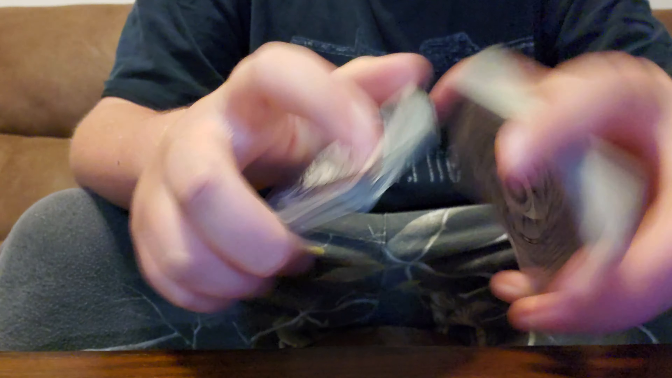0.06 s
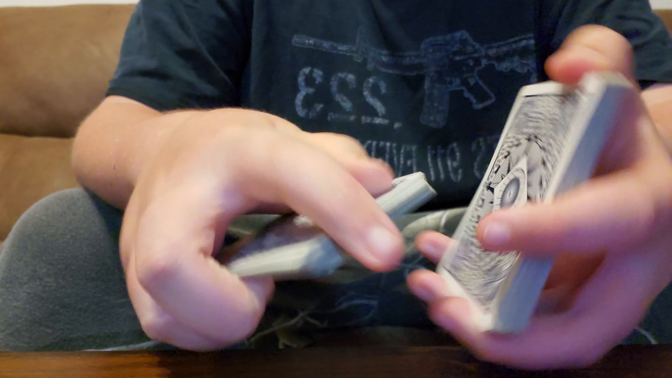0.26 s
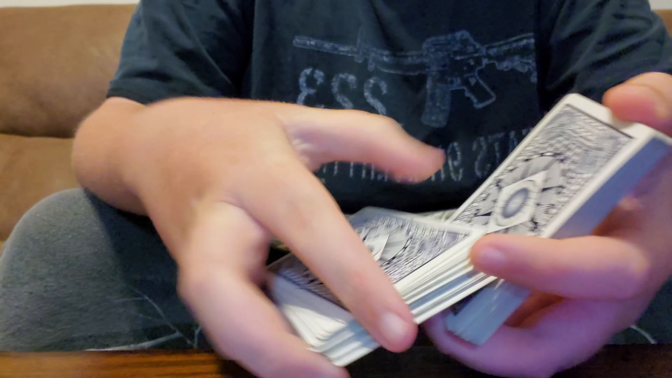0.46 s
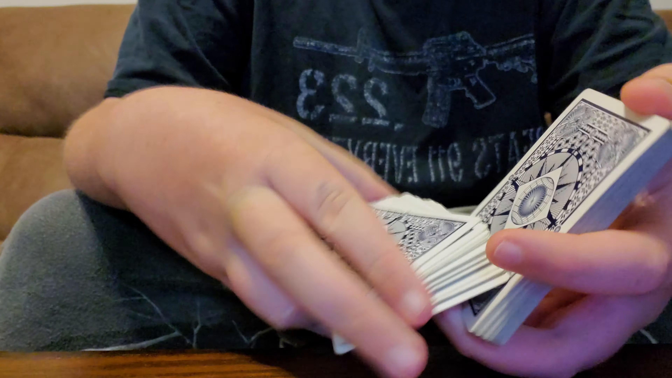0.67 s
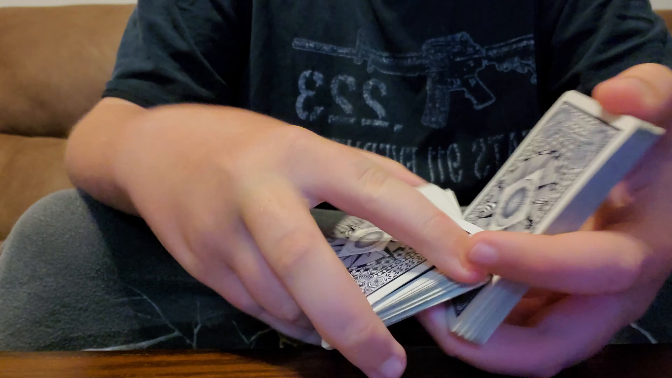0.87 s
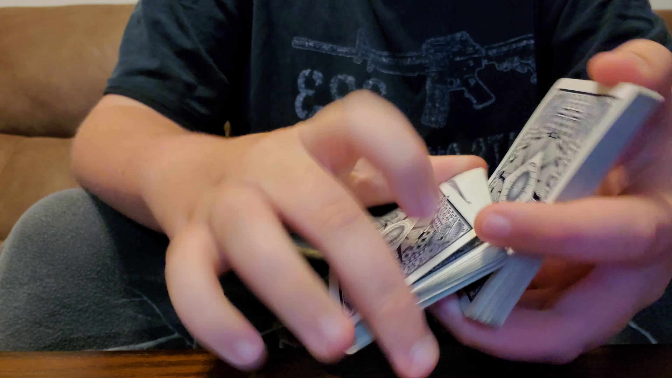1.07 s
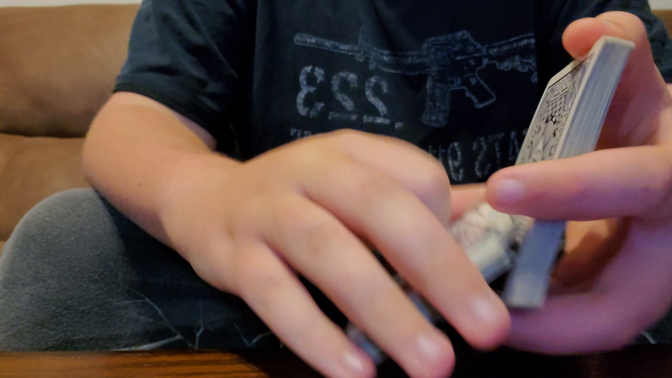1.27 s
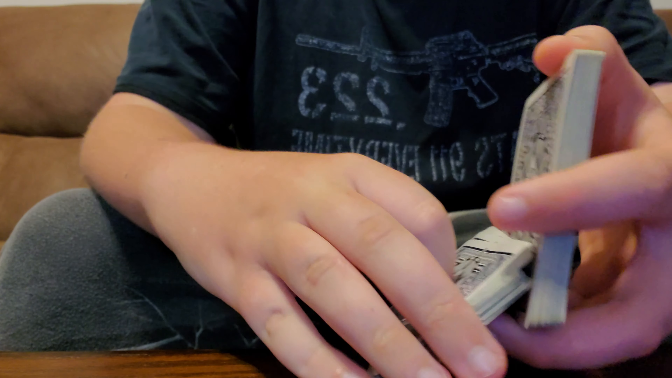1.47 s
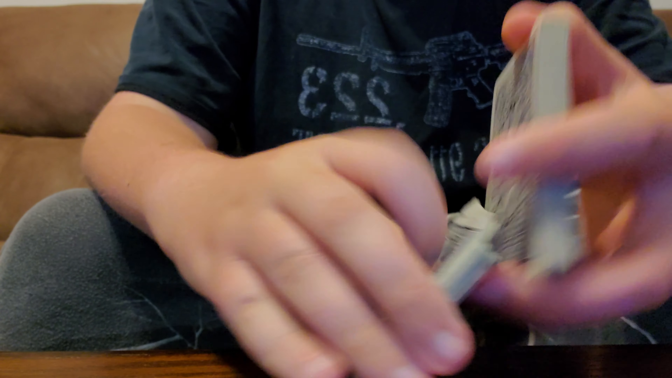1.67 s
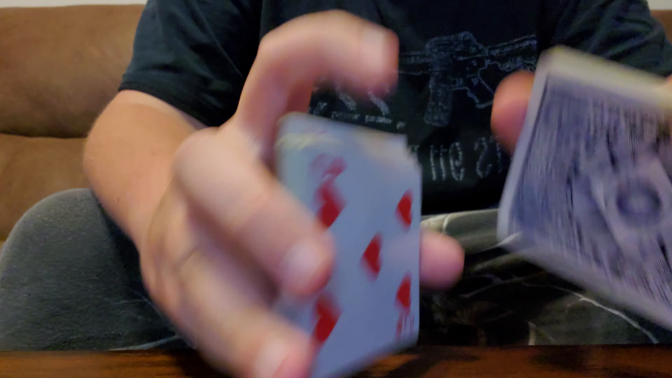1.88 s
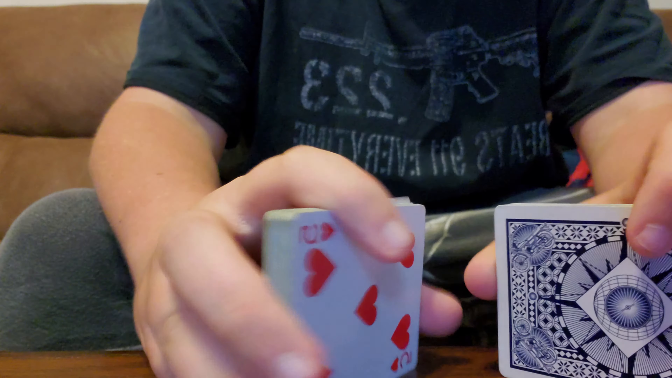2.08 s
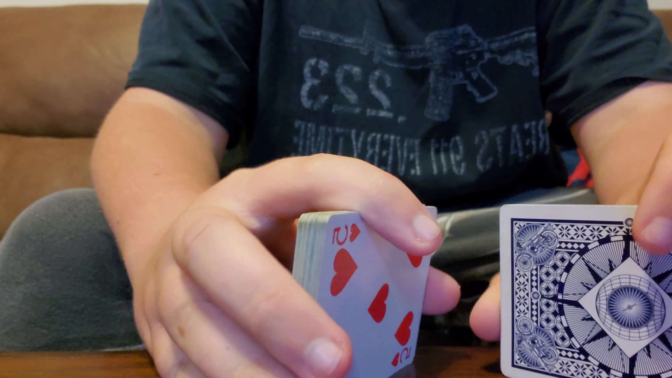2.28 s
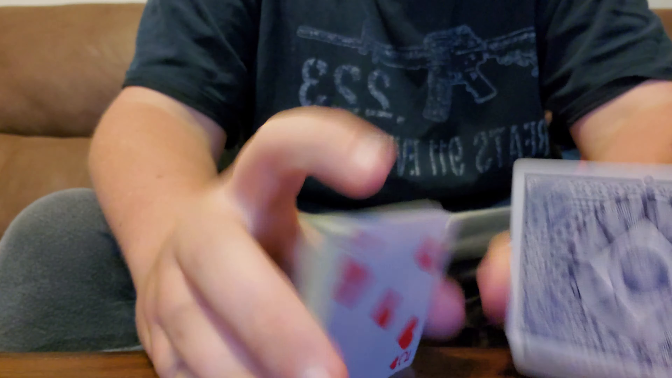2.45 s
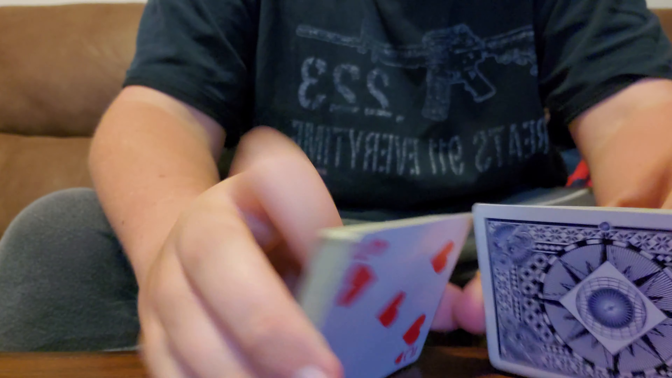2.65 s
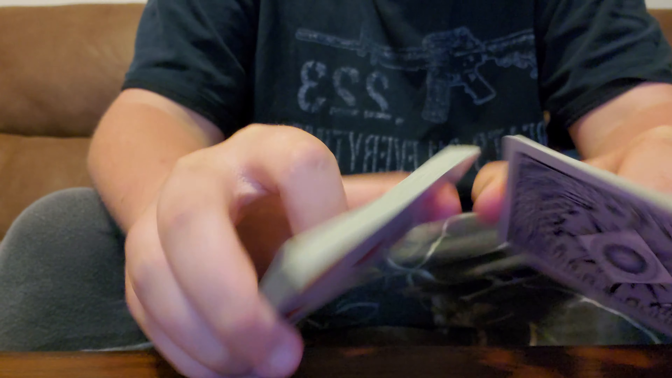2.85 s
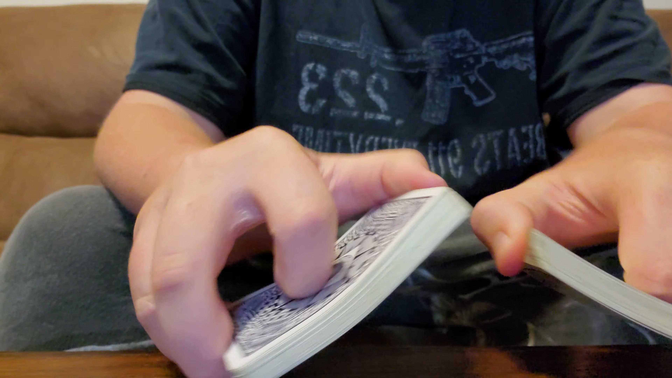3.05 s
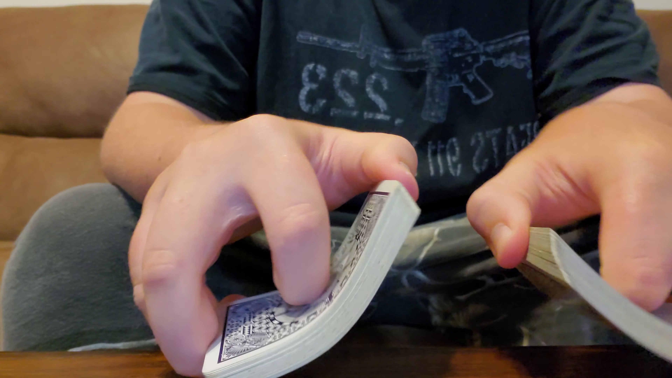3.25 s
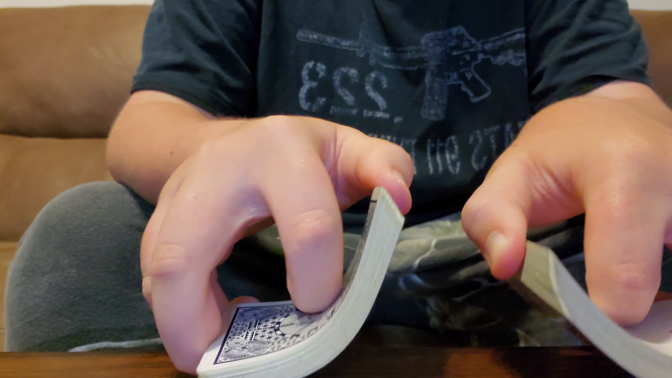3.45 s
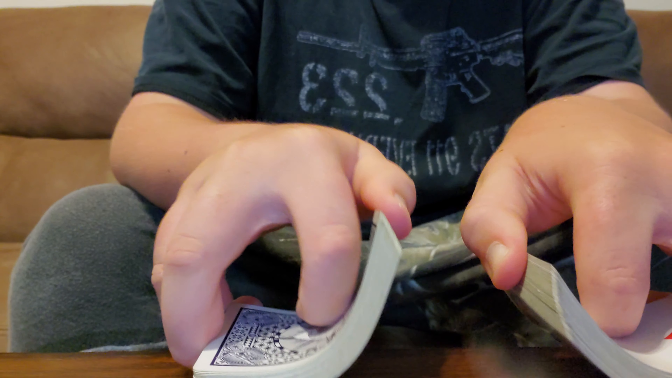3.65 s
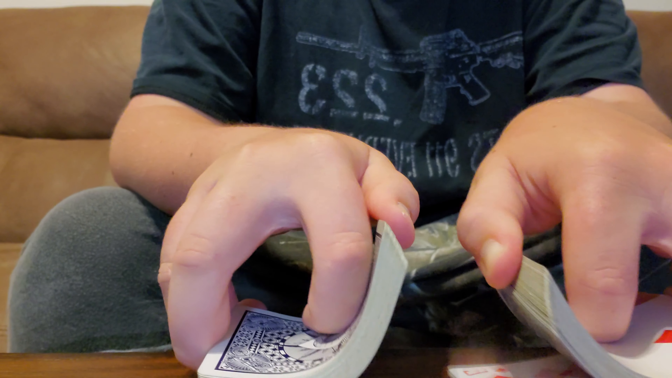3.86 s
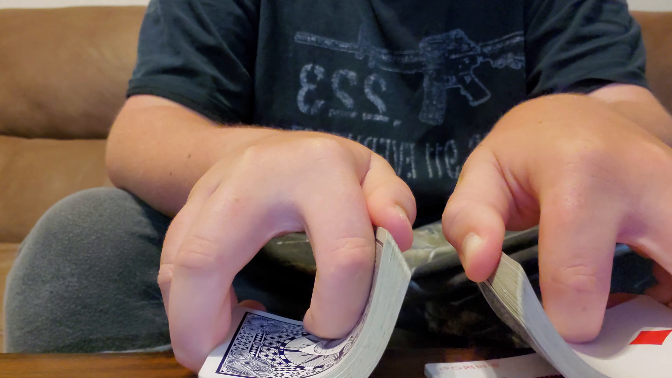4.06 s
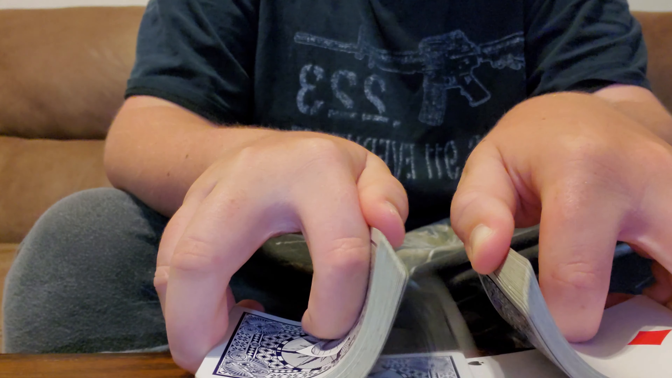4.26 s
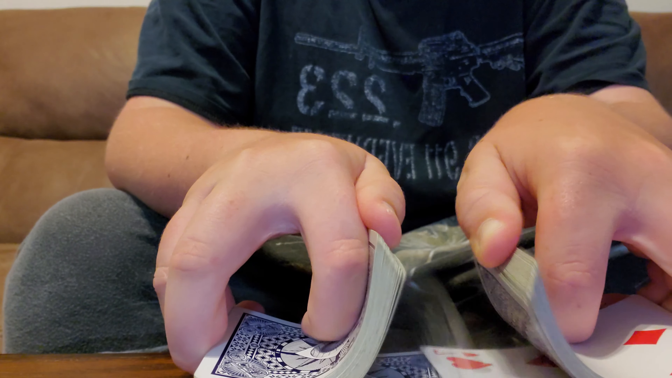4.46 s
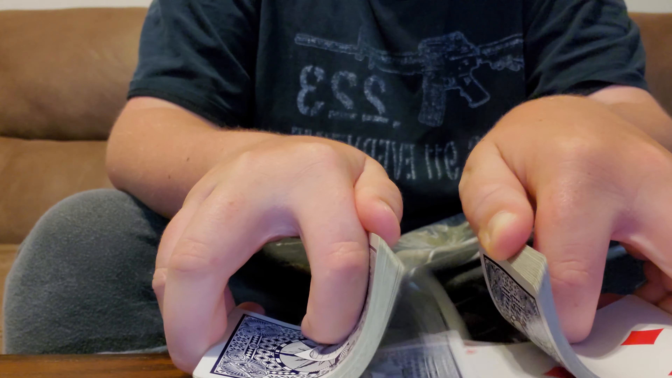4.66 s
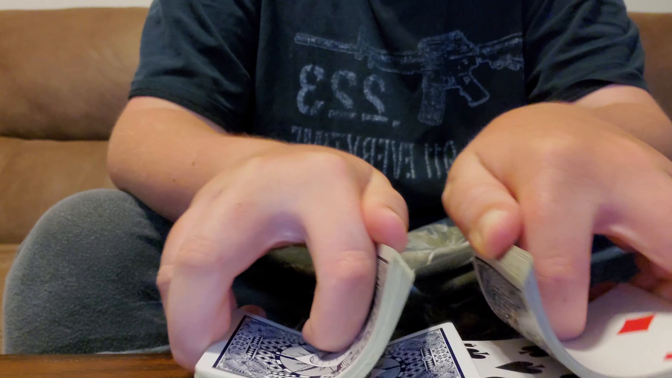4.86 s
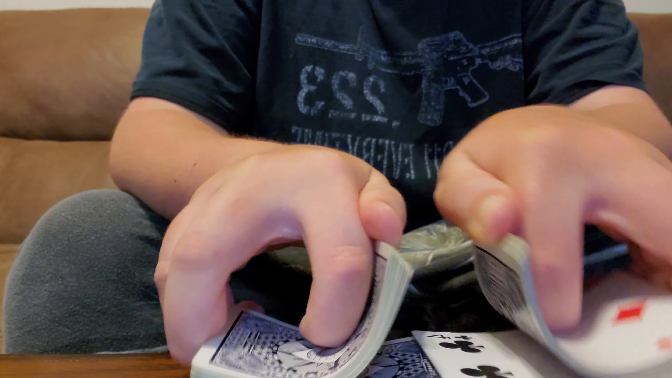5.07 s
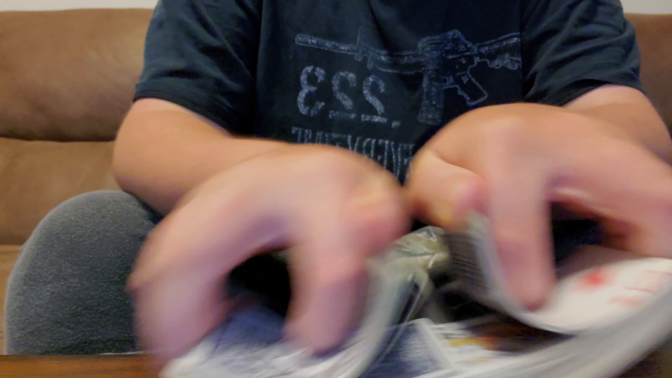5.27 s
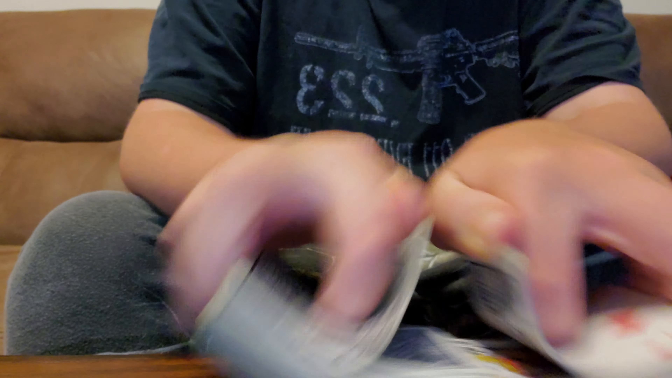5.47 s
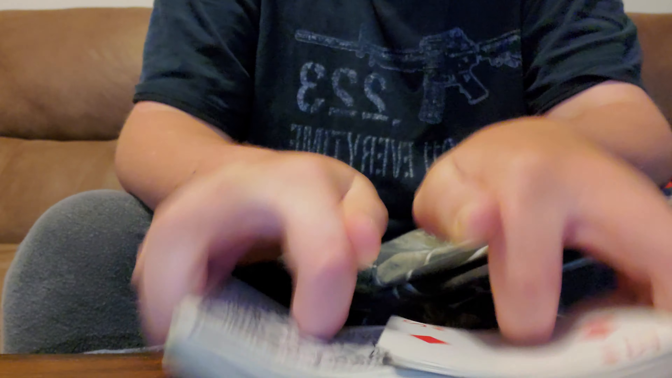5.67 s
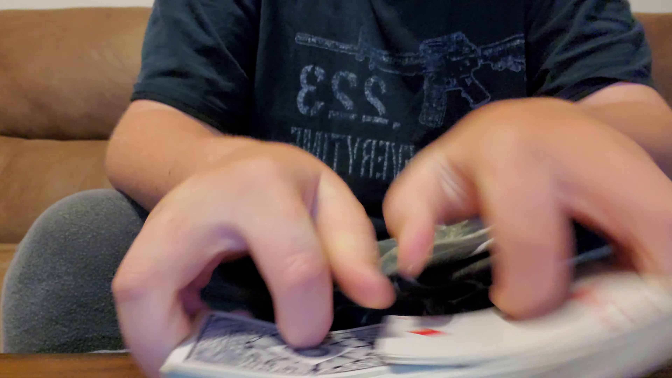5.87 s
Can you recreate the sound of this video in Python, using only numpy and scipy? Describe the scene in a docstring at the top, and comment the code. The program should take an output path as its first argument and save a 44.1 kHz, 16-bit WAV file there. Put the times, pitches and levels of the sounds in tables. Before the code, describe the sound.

Faint papery scuffs of a handled deck come first, over a quiet low room rumble. Around two seconds a rapid woody clatter squares the halves, with a shorter double knock half a second later. A near-quiet gap follows, then a slow riffle: bright dry ticks and slaps, irregularly spaced, thickening toward the end, with puffs of air and a short room tail, heard close in stereo.

```python
"""A small living room, a wooden table, a two-port microphone close to a deck of playing cards.
The deck is handled, its halves are knocked square on the wood, then it is riffled slowly.
Each card slips off the thumb with a tick, flexes, pushes out an air cushion and slaps the pile: filtered noise
bursts and short resonances. The table thumps under it as decaying modes and a dull noise thud.
The room answers through a decaying noise tail, over a soft ventilation rumble and a faint hum."""
import sys
import numpy as np
from scipy import signal
from scipy.fft import rfft, irfft, next_fast_len
from scipy.io import wavfile

SR = 44100
rng = np.random.default_rng(int(sys.argv[2]) if len(sys.argv) > 2 else 0)


def put_to_file(sound):
    """Save the sound as 16-bit audio at rate SR, in the file named by the first command-line argument."""
    columns = np.atleast_2d(sound).T  # one column per channel
    safe = np.clip(columns, -1, 1)
    whole_steps = np.round(safe * 32767)
    wavfile.write(sys.argv[1], SR, whole_steps.astype(np.int16))


N = 261513

# ventilation level over time: start_s [s], level_db [dB]
AIR_LEVEL = [(0, -45.5), (1.8, -46), (2.8, -48.5), (3.2, -49.5), (3.7, -49.5), (5.93, -50)]
# ventilation spectrum: freq_hz [Hz], gain_db [dB]
AIR_COLOUR = [(15, -71), (25, -30.5), (35, -23), (49, -3.5), (87, 2.5), (137, -8.5), (285, -4.5),
              (677, -16.5), (887, -20), (1100, -24.5), (2220, -44.5), (3250, -40.5), (4610, -64),
              (7310, -50.5), (16000, -61)]
# ventilation noise shared by the ports, and nearly separate at each: freq_hz [Hz], gain_db [dB]
AIR_SHARED = [(300, 4.0), (1200, -6.5), (4000, -21.0)]
AIR_SEPARATE = [(200, -10.5), (1200, 3), (4000, 9)]
# steady hum tones: pitch_hz [Hz], level_db [dB]
HUM_TONES = [(59.2, -59.5), (231.5, -66), (290.7, -75.5), (527.6, -76.5), (882.9, -67.5)]
# rumble of moved air at the ports: freq_hz [Hz], gain_db [dB]
PUFF_COLOUR = [(15, -29.0), (35, -22.5), (55, 0), (90, -4.5), (160, -19.5), (500, -44.5), (2000, -90.0)]
# draughts from swaying packets: peak_s [s], level_db [dB], fall_s [s]
DRAUGHTS = [(4.43, -32, 0.25), (4.76, -22.5, 0.12), (5.756, -23, 0.022)]
# cards sliding in the fingers: peak_s [s], body_db [dB], fall_s is second: peak_s, fall_s [s],
# body_db [dB], hiss_db [dB against the body]
SLIDES = [(.04, .04, -65.5, -2.5), (0.129, .022, -60.5, 2), (.495, .09, -70.5, -1.5), (.87, .05, -77, 3),
          (1.021, .022, -62.5, -3.5), (1.088, .022, -53.5, -5), (1.25, 0.037, -61.5, 3),
          (1.36, .06, -64, -7), (1.41, .014, -53.5, -13), (1.676, 0.013, -57.5, -16),
          (1.735, 0.027, -60.5, -10), (1.83, .1, -62.5, -12.5), (2.3, .05, -66, 0),
          (2.6, 0.055, -50.5, -25), (2.865, .02, -71, 0), (3.046, .07, -65.5, -9)]
# hands and held packets bumping the table: start_s [s], level_db [dB]
BUMPS = [(1.017, -29.5), (1.403, -34), (2.0041, -20.5), (2.4823, -17), (3.038, -34.5), (5.4339, -23.5),
         (5.452, -17), (5.605, -19.5), (5.75, -30)]
# card backs rubbing: freq_hz [Hz], gain_db [dB]
RUSTLE_COLOUR = [(500, -6.5), (1500, 0.5), (2200, 1), (2750, -0.5), (3100, 4), (3500, 1), (4600, -20),
                 (9000, -32.5)]
# decay of the room: freq_hz [Hz], t60_s [s]
ROOM_DECAY = [(100, 0.46), (500, 0.56), (1500, 0.7), (3500, 0.45), (8000, 0.41), (15000, 0.27)]
# colour of the reflections: freq_hz [Hz], gain_db [dB]
WALL_COLOUR = [(50, -18), (150, -5), (400, -1), (1100, -10), (3200, -7.5), (5500, -2), (9000, -2),
               (16000, 0.5)]
# riffle sent to the room, low early on while the hands cover the cards: start_s [s], gain_db [dB]
RIFFLE_ROOM_SEND = [(3.73, -10), (3.95, -15), (4.2, -8), (4.33, -7.5), (4.8, -7), (5.15, -11), (5.6, -8.5)]
# bending modes of the table top: pitch_hz [Hz], level_db [dB], t60_s [s]
TABLE_MODES = [(59.5, -14.5, .16), (89.4, -1, 0.35), (111, 5, 0.04), (178, 1.5, 0.031), (259, -3.5, 0.0089)]
# dull thud of the pile under a blow: freq_hz [Hz], gain_db [dB]
THUD_COLOUR = [(30, -36.5), (70, -12.5), (140, 3), (260, -3.5), (420, -4), (700, -20), (2000, -40),
               (8000, -69)]
# modes of a stiff packet against wood: pitch_hz [Hz], level_db [dB], t60_s [s]
PACKET_MODES = [(310, -18, 0.028), (400, -4, 0.12), (540, -0.5, 0.088), (683, -8.5, 0.012),
                (833, 1.5, 0.04), (1028, 3.5, 0.14), (1157, 0, 0.034), (1515, 14, 0.028),
                (1883, -15.5, 0.11), (1800, 3, 0.087)]
# hiss of single card edges: freq_hz [Hz], gain_db [dB]
EDGE_COLOUR = [(2000, -1), (4200, 0), (5800, -2.5), (8400, 7.5), (9800, -0.5), (12000, 6), (15500, -10)]
# edge of a whole packet brushing the wood: freq_hz [Hz], gain_db [dB]
BLUNT_EDGE_COLOUR = [(2000, 2.5), (4200, 16), (5800, -2.5), (8400, 11.5), (10200, -17.5), (12000, 1),
                     (14000, -20.5), (16000, -24.5)]
# air cushion of a landing card: freq_hz [Hz], gain_db [dB]
CUSHION_COLOUR = [(40, -19.5), (120, 1.5), (400, -1), (900, -1), (2200, 8.5), (3600, -8), (4800, -16),
                  (9000, -11), (16000, -2.5)]
# card faces clapping together: freq_hz [Hz], gain_db [dB]
CLATTER_COLOUR = [(150, -0.5), (500, 1), (1100, 3), (1900, -0.5), (2600, -1), (4200, -12.5), (6000, -43.5),
                  (12000, -42.5)]
# packet edges hitting the table: start_s [s], ring_db, slap_db, hiss_db [dB], contact_s [s]
KNOCKS = [(1.9873, -31, -31.5, -50, .0017), (1.9954, -17.5, -16.5, -28.5, 0.004),
          (2.0041, -17, -21.5, -34.5, 0.0044), (2.03, -36, -20.5, -42, 0.0037),
          (2.0366, -32.5, -21.5, -52, 0.0025), (2.0618, -10.5, -22.5, -26, 0.00064),
          (2.0708, -22, -28.5, -34, .0028), (2.0789, -21.5, -31.5, -39, 0.00055),
          (2.1621, -28.5, -40.5, -51.5, 0.0004), (2.4822, -54.5, -27.5, -57, 0.0022),
          (2.4915, -20.5, -14.5, -44.5, 0.00072), (2.5254, -48, -10, -33, .0012),
          (2.5327, -21.5, -16.5, -26, .003)]
# cards flicking off the thumbs: start_s [s], ring_db, hiss_db [dB], pitch_hz [Hz], contact_s [s]
FLICKS = [(3.734, -23.5, -21, 3120, 0.0031), (3.7681, -20, -27.5, 3190, 0.0014),
          (3.8103, -22, -28, 2980, 0.00035), (3.922, -24.5, -34, 3000, 0.00068),
          (4.0486, -20.5, -24.5, 3110, 0.00021), (4.066, -22.5, -35, 3230, 0.000067),
          (4.218, -20, -25.5, 2970, 0.00026), (4.2757, -18, -24, 2740, 0.00021),
          (4.2826, -14, -21, 3280, 0.00092), (4.3228, -27.5, -31.5, 2950, 0.0013),
          (4.3842, -18, -25, 2970, .0015), (4.4398, -32, -36, 2970, 0.0034),
          (4.4486, -16.5, -17, 3300, 0.00066), (4.494, -14.5, -20.5, 3400, 0.00098),
          (4.5277, -29, -24.5, 2780, 0.0011), (4.533, -13, -29.5, 3180, 0.0032),
          (4.647, -28, -37, 3040, 0.0021), (4.6846, -14, -17, 3220, .0043),
          (4.7084, -24.5, -26.5, 3300, 0.0093), (4.7309, -26, -31, 3120, 0.0021),
          (4.7456, -23, -35, 3130, 0.0012), (4.7675, -30, -30.5, 2950, 0.0011),
          (4.7713, -13.5, -22, 3220, 0.0015), (4.83, -28, -36.5, 3450, 0.0036),
          (4.8861, -19, -32, 3130, 0.0015), (4.8924, -16, -21.5, 3160, 0.0022),
          (4.9454, -15.5, -23.5, 3200, 0.003), (5.0244, -22.5, -31.5, 3060, 0.002),
          (5.032, -24.5, -27, 3400, 0.0033), (5.0744, -33, -27.5, 3330, 0.0025),
          (5.0815, -20, -21, 3600, 0.002), (5.1584, -24, -27, 3400, .0039),
          (5.1629, -25.5, -23, 3420, 0.001), (5.2392, -35.5, -19, 2700, 0.0003),
          (5.2596, -31.5, -38, 3140, 0.0012), (5.284, -21, -21.5, 3060, 0.00085),
          (5.297, -25.5, -38, 3450, 0.00056), (5.3085, -14.5, -20, 2610, 0.0013),
          (5.3124, -21, -19, 3340, 0.0046), (5.411, -31, -35, 2790, 0.003),
          (5.4349, -25, -26.5, 2800, 0.00088), (5.452, -23, -28, 2660, 0.00033),
          (5.4688, -24, -32, 3560, 0.00013), (5.546, -17, -24.5, 3070, 0.00046),
          (5.5766, -22, -25, 3900, 0.0034), (5.585, -28, -17.5, 3300, 0.0034),
          (5.6023, -21, -21, 3150, 0.0024), (5.6172, -24, -21.5, 3080, 0.00064)]
# treble difference between the microphone ports: freq_hz [Hz], left_minus_right_db [dB]
PORT_DIFFERENCE = [(120, -.5), (500, -2.3), (1000, -3), (2800, -2.5), (3200, -4.5), (4400, 0), (5800, -6),
                   (7200, -7), (8400, 3), (10200, 5), (11700, -2), (13800, -9), (16000, -9)]

TOP_HZ = 16000
# buffer of one short sound, with its contact LEAD samples in
SIZE, LEAD = 16384, 512
AGE = (np.arange(SIZE) - LEAD) / SR  # seconds since contact
TIME = np.arange(N) / SR
# every landing fans a puff of air
PUFF_DB, PUFF_RISE_S, PUFF_FALL_S = -44, 0.01, 0.022
# rise time as a share of the fall time: slides gather speed faster than they stop
SLIDE_RISE_SHARE, DRAUGHT_RISE_SHARE = 0.6, 0.93
# each card creeps over the thumb before it snaps free, then skids on the pile:
# body against its ring, hiss against its edge hiss
CREEP_S, SKID_S, SKID_BODY_DB, SKID_HISS_DB = 0.0051, 0.031, -21, -30
KNOCK_RING_HZ = 2950
KNOCK_THUMP_DB = -12.5  # against the slap
# cards weigh the same: a short contact slaps the air, a longer one pushes the table (levels for 1 ms)
FLICK_SLAP_DB, SLAP_DB_PER_DOUBLING = -22.5, -1.5
FLICK_THUMP_DB, THUMP_DB_PER_DOUBLING = -28, 1.7
# the riffle climbs the packets, so later cards drop from higher and thump harder
DROP_DB_PER_S = 2.5
# a card that springs hard has less left for its landing: dB lost per dB of ring above the knee
SPRING_KNEE_DB, SPRING_LOSS = -18, 1
# a hard snap beams at the microphone: room share lost, in dB per dB of ring above the knee
BEAM_KNEE_DB, BEAM_LOSS = -14, 0.8


def amp(db):
    """Decibels to amplitude."""
    return 10 ** (np.asarray(db) / 20)


def at_hz(points, hz):
    """Read a table of (Hz, value) on a log-frequency axis."""
    f, v = np.transpose(points)
    return np.interp(np.log(np.maximum(hz, 1)), np.log(f), v)


def colour(x, points):
    """Causal minimum-phase filter with the given (Hz, dB) response."""
    n = next_fast_len(x.shape[-1] // 2 + 1024) * 2
    gain_db = at_hz(points, np.fft.rfftfreq(n, 1 / SR))
    cepstrum = irfft(np.log(amp(gain_db)))
    # folding the cepstrum forward makes the filter causal
    cepstrum[1:n // 2] *= 2
    cepstrum[n // 2 + 1:] = 0
    response = np.exp(rfft(cepstrum))
    return irfft(rfft(x, n) * response)[..., :x.shape[-1]]


def resonate(x, hz, width_hz):
    """One resonance, gain 1 at its centre."""
    return signal.lfilter(*signal.iirpeak(hz, hz / width_hz, fs=SR), x)


def highpass(x, hz):
    """Second-order loss of the bass below hz."""
    return signal.sosfilt(signal.butter(2, hz, "highpass", fs=SR, output="sos"), x)


def steady(x, db):
    """Bring a lasting sound to an rms level."""
    return x * amp(db) / np.sqrt(np.mean(x ** 2))


def blow(x, db):
    """Give a short sound the energy of 5 ms at this rms level."""
    energy = np.mean(np.sum(x ** 2, axis=-1))
    return x * amp(db) * np.sqrt(0.005 * SR / energy)


def add(out, s, x):
    """Mix a short sound in with its contact at time s."""
    start = int(s * SR) - LEAD
    out[:, start:start + SIZE] += x[..., :N - start]


def pair(size, likeness):
    """Left and right noise that are partly alike."""
    c = np.clip(likeness, 0, 1)
    noise = rng.standard_normal((3, size))
    return np.sqrt(c) * noise[0] + np.sqrt(1 - c) * noise[1:]


def fade(seconds):
    """Exponential decay from the moment of contact."""
    return (AGE >= 0) * np.exp(-np.maximum(AGE, 0) / seconds)


def swell(s, rise_s, fall_s):
    """A movement that grows until time s and then dies away."""
    span_s = np.where(TIME < s, rise_s, fall_s)
    return np.exp(-np.minimum(np.abs(TIME - s) / span_s, 20))


def ventilation():
    """Soft rumble, alike at both ports in the bass, with faint steady tones."""
    bass = colour(pair(N, likeness=1.0), AIR_SHARED)
    treble = colour(pair(N, likeness=0.035), AIR_SEPARATE)
    level_db = np.interp(TIME, *np.transpose(AIR_LEVEL))
    air = steady(colour(bass + treble, AIR_COLOUR), level_db)
    hum = sum(amp(db) * np.sqrt(2) * np.sin(2 * np.pi * (hz * TIME + rng.random()))
              for hz, db in HUM_TONES)
    return air + hum


def buffet():
    """Air fanned by the falling cards and swaying packets rumbles on the nearer, left port."""
    rumble = steady(colour(pair(N, likeness=0.15), PUFF_COLOUR), 0)
    fanned = sum((amp(PUFF_DB) * swell(s, PUFF_RISE_S, PUFF_FALL_S)) ** 2 for s, *_ in FLICKS)
    pushed = sum((amp(db) * swell(s, DRAUGHT_RISE_SHARE * fall_s, fall_s)) ** 2
                 for s, db, fall_s in DRAUGHTS)
    port_gain = amp([[3], [-8]])
    return rumble * np.sqrt(fanned + pushed) * port_gain


def hands():
    """Packets slide in the fingers and cards skid with a fine grain; now and then the table is nudged."""
    body, hiss = np.zeros((2, N))
    for s, fall_s, db, hiss_db in SLIDES:
        speed = amp(db) * swell(s, SLIDE_RISE_SHARE * fall_s, fall_s)
        body += speed
        hiss += amp(hiss_db) * speed
    for s, ring_db, hiss_db, *_ in FLICKS:
        speed = swell(s, CREEP_S, SKID_S)
        body += amp(ring_db + SKID_BODY_DB) * speed
        hiss += amp(hiss_db + SKID_HISS_DB) * speed
    # the grain holds one random level for 64 samples
    grain = amp(4 * np.repeat(rng.standard_normal(N // 64 + 1), 64)[:N])
    out = body * steady(colour(pair(N, likeness=0.22) * grain, RUSTLE_COLOUR), 0)
    out += hiss * steady(colour(pair(N, likeness=0.2) * grain, EDGE_COLOUR), 0)
    for s, db in BUMPS:
        add(out, s, blow(resonate(thump(0), 91, 220), db))
    return out


def room(x, gap_s, build_s):
    """Sparse first reflections thicken into a diffuse tail; each band decays at its own rate."""
    t = np.arange(SR * 3 // 4) / SR
    hz = np.fft.rfftfreq(len(t), 1 / SR)
    # strong random levels at first leave a few reflections standing out
    unevenness = np.exp(1.5 * np.exp(-t / 0.018) * rng.standard_normal(len(t)))
    echoes = rfft(pair(len(t), likeness=0.1) * unevenness)
    centres = [f for f, _ in ROOM_DECAY]
    tail = np.zeros((2, len(t)))
    for (_, t60), share in zip(ROOM_DECAY, np.eye(len(ROOM_DECAY))):
        band = irfft(echoes * at_hz(np.c_[centres, share], hz), len(t))
        tail += band * amp(-60 * t / t60)
    tail *= np.clip((t - gap_s) / build_s, 0, 1)
    tail = colour(tail / np.sqrt(np.sum(tail ** 2) / 2), WALL_COLOUR)
    return signal.fftconvolve(x, tail, axes=1)[:, :N]


def ring(modes, detune, scatter_db):
    """Struck modes; every blow lands on a different spot, so pitches and levels scatter."""
    out = np.zeros(SIZE)
    for (hz, db, t60), (a, b) in zip(modes, rng.standard_normal((len(modes), 2))):
        tone = np.sin(2 * np.pi * hz * (1 + detune * a) * AGE)
        out += amp(db + scatter_db * b) * tone * fade(t60 / np.log(1000))
    return out


def thump(db):
    """The table rings briefly under a dull thud; so small a board radiates no deep bass."""
    modes = ring(TABLE_MODES, detune=0.05, scatter_db=2)
    thud = colour(pair(SIZE, likeness=0.85) * fade(0.0052), THUD_COLOUR)
    board = blow(modes, 0) + blow(thud, -5.5)
    return blow(highpass(board, 55), db)


def scrape(length, likeness):
    """Stick-slip of card edges: a short rough burst that dies away soon after the contact ends."""
    bite = np.exp(np.minimum(AGE, 0) / (0.14 * length))
    grip = np.exp(-(np.maximum(AGE, 0) / length) ** 2) + 0.09 * fade(0.0059)
    return pair(SIZE, likeness) * bite * grip


def flex(length, hz, width_hz):
    """The bent card springs back and rings for a few cycles."""
    click = np.arange(SIZE) == LEAD
    push = scrape(length, likeness=0.86) - 1.6 * click
    return resonate(resonate(push, hz, width_hz), hz, 2.5 * width_hz)


def knock(_s, ring_db, slap_db, hiss_db, length):
    """Half the deck lands on its edge; loose cards clack down after it."""
    hz, thump_db = KNOCK_RING_HZ, slap_db + KNOCK_THUMP_DB
    roughness = np.exp(0.93 * rng.standard_normal(SIZE))
    loose = pair(SIZE, likeness=0.039) * roughness * (fade(0.0049) + 0.077 * fade(0.04))
    # many cards ring at once, so their pitch is blurred
    cards = flex(1.5 * length, hz, width_hz=800)
    loose_ring = resonate(resonate(loose, 2.9 * hz, 1800), hz, 1896)
    clack = blow(cards, 0) + blow(loose_ring, -7.5)
    contact = blow(-resonate(resonate(fade(0.000092), 1100, 1300), 1100, 2100), 0)
    # the packet radiates a different mix of its modes towards each port
    packet = np.array([ring(PACKET_MODES, detune=0.015, scatter_db=3) for _ in range(2)])
    slap = contact + blow(packet, -1.8) + blow(colour(loose, CLATTER_COLOUR), 0.3)
    # the thick packet damps the treble steeply; only its edges hiss
    damping = signal.butter(5, 4600, fs=SR, output="sos")
    body = signal.sosfilt(damping, blow(clack, ring_db) + blow(slap, slap_db))
    hiss = blow(colour(scrape(length, likeness=0.13), BLUNT_EDGE_COLOUR), hiss_db)
    return body + hiss + thump(thump_db)


def release(ring_db, hz, flight_s):
    """A faint tick as the card leaves the thumb, one short flight before it lands."""
    slip = scrape(0.00083, likeness=0.12)
    tick = blow(resonate(slip, hz, 2000), ring_db - 33)
    flight = flight_s * (1 + 0.15 * rng.standard_normal()) * SR
    early = int(np.clip(flight, 1, LEAD - 32))  # kept inside the lead of the buffer
    return np.pad(tick[:, early:], ((0, 0), (0, early)))


def cushion(rise_s, fall_s):
    """Suction grows behind the speeding card, then flips to pressure as it lands."""
    before = np.minimum(AGE, 0)
    suction = (AGE < 0) * (np.exp(before / rise_s) + 0.17 * np.exp(before / 0.001))
    pressure = 0.25 * fade(fall_s)
    return colour(pressure - suction, CUSHION_COLOUR)


def flick(s, ring_db, hiss_db, hz, length):
    """One card, or a few stuck together, snaps onto the pile."""
    spent_db = SPRING_LOSS * max(ring_db - SPRING_KNEE_DB, 0)
    doublings = np.log2(length / 0.001)
    slap_db = FLICK_SLAP_DB + SLAP_DB_PER_DOUBLING * doublings - spent_db
    drop_db = DROP_DB_PER_S * (s - FLICKS[0][0])
    thump_db = FLICK_THUMP_DB + THUMP_DB_PER_DOUBLING * doublings + drop_db - spent_db
    # the free corner rings at its own pitch, the whole card always near the same one
    corner = flex(length, hz, width_hz=700)
    snap = blow(corner + 0.99 * resonate(corner, 3580, 680), ring_db)
    rise_s = 0.00056 * np.exp(0.75 * rng.standard_normal())
    air = blow(cushion(rise_s, fall_s=0.00084), 0)
    chatter = blow(colour(scrape(1.73 * length, likeness=0.022), CLATTER_COLOUR), -3.5)
    slap = blow(air + chatter, slap_db)
    hiss = blow(colour(scrape(length, likeness=0.1), EDGE_COLOUR), hiss_db)
    return snap + slap + hiss + thump(thump_db) + release(ring_db, hz, flight_s=0.016)


def play(table, voice, pan_db, pan_spread_db, lag_s, lag_spread_s):
    """The direct sound of a table of contacts, and the share that they throw into the room."""
    near, thrown = np.zeros((2, 2, N))
    for s, ring_db, *contact in table:
        left, right = voice(s, ring_db, *contact)
        # every card lands somewhere else, so its path to the two ports differs
        nearer, later = rng.standard_normal(2)
        lag = int((lag_s + lag_spread_s * later) * SR)
        sound = np.array([left, np.roll(right, lag)])
        port_gain = steady(amp([[pan_db + pan_spread_db * nearer], [0]]), 0)
        add(near, s, sound * port_gain)
        beamed_db = BEAM_LOSS * max(ring_db - BEAM_KNEE_DB, 0)
        add(thrown, s, sound * amp(-beamed_db))
    return near, thrown


def scene():
    """Two groups of knocks and a riffle in a small room, with handling noise and ventilation."""
    knocks, knocks_thrown = play(KNOCKS, knock, pan_db=0.5, pan_spread_db=0.7,
                                 lag_s=0.00001, lag_spread_s=0.00007)
    flicks, flicks_thrown = play(FLICKS, flick, pan_db=1.4, pan_spread_db=1.75,
                                 lag_s=0.00005, lag_spread_s=0.00007)
    riffle_send = amp(np.interp(TIME, *np.transpose(RIFFLE_ROOM_SEND)))
    thrown = amp(-9.0) * knocks_thrown + riffle_send * flicks_thrown
    echo = room(thrown, gap_s=0.01, build_s=0.004)
    return ventilation() + buffet() + hands() + echo + knocks + flicks


def record(dry):
    """The deepest bass is lost, each port adds its colour, peaks clip at full scale and the top is cut."""
    lean = highpass(dry, 26)
    # each port takes half of the difference, with opposite sign
    ported = np.array([colour(x, [(hz, side * db / 2) for hz, db in PORT_DIFFERENCE])
                       for x, side in zip(lean, (1, -1))])
    top_cut = signal.ellip(8, 0.2, 70, TOP_HZ, fs=SR, output="sos")
    return signal.sosfilt(top_cut, np.clip(ported, -1, 1))


dry = scene()
out = record(dry)
put_to_file(out)
```